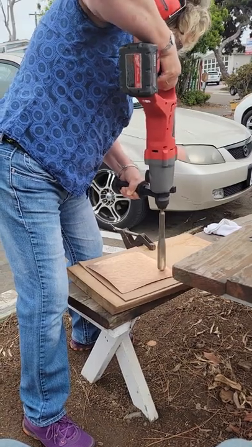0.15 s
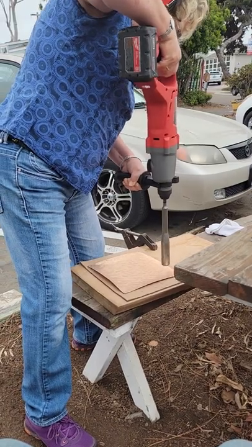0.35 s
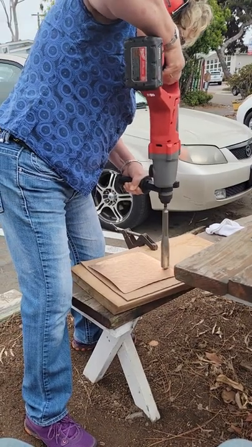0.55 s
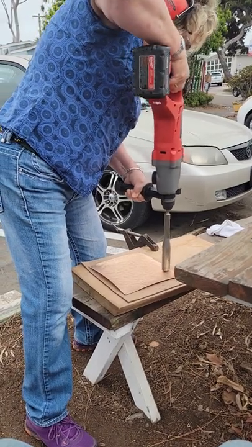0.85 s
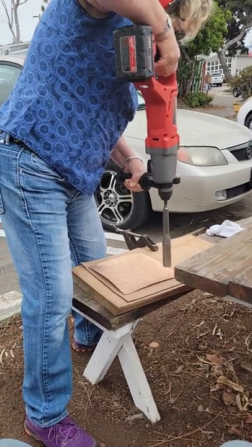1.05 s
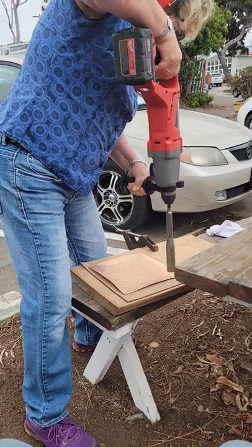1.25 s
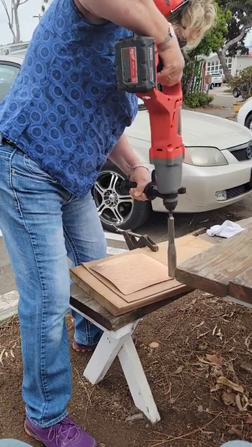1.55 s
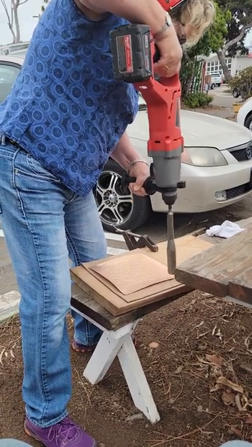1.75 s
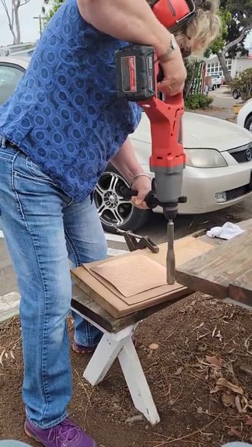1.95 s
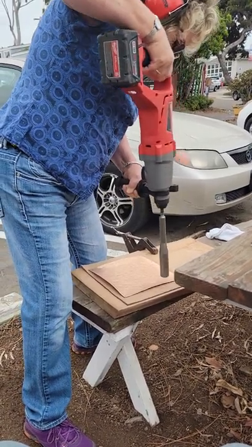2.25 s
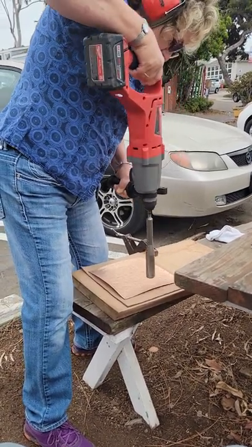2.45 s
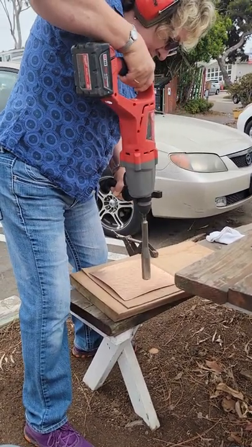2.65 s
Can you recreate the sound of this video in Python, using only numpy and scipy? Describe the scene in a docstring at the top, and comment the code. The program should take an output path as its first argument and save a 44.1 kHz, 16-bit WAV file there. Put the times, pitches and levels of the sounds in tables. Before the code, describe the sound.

Rotary hammer chiselling outdoors: rattling motor whir broken by rapid clattering blows, then coasting down

```python
"""A cordless rotary hammer chisels at a sheet lying on boards across a trestle, outdoors.
Running free, its crank knocks once a turn over rattling gears (filtered clicks and pulsed noise) and a
motor whine (sines). After two opening blows it is pressed down three times and pounds in short bursts of
crack, zing and thud; the sheet's modes ring, and so does the loose chisel as it is lifted.
Then the trigger is let go and the motor coasts, over a low street rumble."""
import sys
import numpy as np
from scipy import signal
from scipy.fft import rfft, irfft, next_fast_len
from scipy.io import wavfile
from scipy.ndimage import uniform_filter1d

SR = 44100
rng = np.random.default_rng(int(sys.argv[2]) if len(sys.argv) > 2 else 0)


def master_out(mix):
    """Clip the mix to full scale and print it as 16-bit PCM to the path in sys.argv[1]."""
    frames = np.transpose(np.atleast_2d(mix))
    ceiling = np.clip(frames, -1, 1)
    pcm = np.round(ceiling * 32767).astype(np.int16)
    wavfile.write(sys.argv[1], SR, pcm)


N = 123479
T = np.arange(N) / SR

CRANK_HZ, MOTOR_PER_CRANK = 72.7, 6.25  # steady crank speed; motor turns per crank turn
RELEASE_S, COAST_S = 2.465, .42  # trigger let go; time constant of the falling speed
# Stretches of free running: (first knock [s], end [s])
FREE_RUNS = [(0.2574, .765), (1.0882, 1.385), (1.6237, 1.96), (2.1865, 2.8)]
# Loudness of the running mechanism: (time [s], body level [dB], treble level [dB])
DRIVE_LEVELS = [(0.188, -59, -56), (.21, -17, -21), (.27, -27, -26.5), (.36, -21, -22.5), (.74, -19.5, -19),
                (.83, -27.5, -37), (.93, -23.5, -32.5), (1.0, -27.5, -24), (1.11, -31, -31.5),
                (1.22, -29, -27.5), (1.36, -27.5, -26.5), (1.47, -18.5, -35), (1.64, -34.5, -33.5),
                (1.72, -31.5, -31.5), (1.91, -30.5, -29), (2.05, -22.5, -33), (2.21, -34, -32.5),
                (2.35, -29, -29), (2.47, -27, -28.5), (2.57, -31.5, -33), (2.68, -39.5, -39.5),
                (2.8, -46, -40.5)]
# Knock of the housing, low part: (multiple of crank speed, level [dB])
KNOCK_HARMONICS = [(1, -12), (2, -26), (3, -26), (4, -15), (6, -16), (7, -8), (8, -16), (9, -17), (10, -2),
                   (11, -11), (12, -11), (13, -2), (14, 1), (15, -4), (16, 0), (17, 4), (18, 0), (19, -3),
                   (20, 2), (22, 0), (23, -7), (24, -9)]
# Knock of the housing, upper part: (frequency [Hz], level [dB])
KNOCK_TREBLE = [(1950, -9), (2150, -13), (2500, -4), (2900, -12), (4000, -18), (6800, -21), (8500, -29),
                (15500, -32)]
# Colour of the gear rattle: (frequency [Hz], level [dB])
GEAR_SPECTRUM = [(40, -26), (250, -17), (600, -16), (850, -11), (1050, -6), (1500, -6), (1800, -8),
                 (2150, -9), (2550, 1), (2900, -4), (3600, -5), (4700, -12), (7000, -30), (16000, -45)]
# Colour of the treble fizz: (frequency [Hz], level [dB])
FIZZ_SPECTRUM = [(40, -59), (2500, -61), (4300, 0), (5700, 2.5), (6700, 6.5), (7700, 6.5), (8400, -4),
                 (9300, -0.5), (11000, -6.5), (13000, -7.5), (13900, 5), (16000, -39)]
# Colour of the short tick at each crank knock: (frequency [Hz], level [dB])
TICK_SPECTRUM = [(100, -50), (3000, -12), (6000, -2), (9500, 0), (12000, -2), (16000, 0)]
KNOCK_DB, GEARS_DB, FIZZ_DB, WHIRR_DB = -2.8, -5.3, -6.5, -10
# Motor and gear whine: (multiple of motor speed, level [dB])
WHINE_HARMONICS = [(4, -6), (5, -1), (6, -6), (7, -7), (8, -6), (10, 0), (12, 1), (14, -8)]
# Resonances of the housing that the whine passes through: (frequency [Hz], level [dB])
HOUSING_SPECTRUM = [(100, -30), (800, -12), (1120, 0), (1550, -3), (2050, -13), (2350, -4), (2580, 2),
                    (2780, -1), (3050, -9), (3480, -4), (3900, -12), (6000, -16), (16000, -40)]
WHINE_DB = -55

# Hammer blows, relative levels:
# (time [s], peak [dB, unused], crack [dB], chisel zing [dB], thud of the boards [dB])
HAMMER_BLOWS = [(0.212, -6, -19.5, -15.5, -38), (0.243, -6, -19, -14.5, -31.5), (0.757, -6, -24, -18, -32),
                (0.773, -8, -17.5, -18, -25), (0.785, -9, -25, -19, -18.5), (0.799, -7, -17.5, -23, -25),
                (0.814, -8, -22, -21, -21), (0.827, -5, -19, -28, -24), (0.843, -11, -27, -21, -23),
                (0.857, -10, -20.5, -41, -24.5), (0.871, -12, -20.5, -24, -31), (0.884, -8, -21, -25, -23),
                (0.903, -13, -23, -25, -23), (0.914, -9, -20.5, -24, -24), (0.944, -6, -17.5, -22, -44),
                (0.959, -12, -28, -20, -21.5), (0.972, -8, -32, -13, -43), (0.986, -7, -26, -16.5, -25.5),
                (1.016, -15, -32, -24, -33), (1.034, -15, -30, -25, -29), (1.051, -16, -30.5, -29, -38),
                (1.067, -16, -29, -43, -36), (1.383, -7, -22, -22, -18), (1.395, -13, -23.5, -25, -21),
                (1.411, -9, -22, -22, -36), (1.425, -7, -16.5, -16, -28), (1.439, -10, -18.5, -33, -28),
                (1.452, -8, -26, -24, -21.5), (1.465, -7, -24, -17.5, -21.5), (1.481, -9, -21.5, -28, -25),
                (1.494, -6, -17, -15, -16.5), (1.512, -12, -26, -28, -35), (1.523, -4, -15.5, -20, -29.5),
                (1.553, -5, -18.5, -18.5, -26.5), (1.584, -12, -27, -22, -34),
                (1.59, -13, -36, -25.5, -35.5), (1.598, -15, -28, -24.5, -38), (1.933, -15, -51, -25, -21),
                (1.959, -9, -26.5, -22, -23), (1.976, -9, -20.5, -19.5, -22),
                (1.986, -6, -17.5, -20, -26.5), (2.001, -6, -19, -20, -28), (2.014, -4, -16.5, -17, -15.5),
                (2.03, -7, -19.5, -20, -26), (2.042, 10, -20, -24, -23), (2.072, -9, -14.5, -18, -28),
                (2.101, -5, -15.5, -23, -27), (2.13, -7, -17, -19, -25.5), (2.146, -12, -35, -21, -27.5),
                (2.159, -12, -34, -19.5, -34), (2.175, -14, -31.5, -20.5, -29.5)]
# Colour of the crack: (frequency [Hz], level [dB])
CRACK_SPECTRUM = [(100, -12), (500, -8.5), (720, 0.5), (850, -0.5), (980, -6.5), (1100, -0.5), (1350, 2.5),
                  (1780, 4.5), (2200, -10), (2570, -3), (2900, -4.5), (3600, -1), (4700, -18.5),
                  (7000, -7.5), (8500, -19.5), (11000, -17), (16000, -41)]
# Colour of the steel zing: (frequency [Hz], level [dB])
ZING_SPECTRUM = [(100, -50), (5000, -7), (9500, -16), (11000, -14), (13000, -8), (14200, -6.5),
                 (15600, 4.5), (16500, -4)]
# Colour of the thud: (frequency [Hz], level [dB])
THUD_SPECTRUM = [(30, -12), (70, -17), (120, -10.5), (160, -20), (215, -5), (250, 0.5), (310, -1.5),
                 (400, -4.5), (600, -10.5), (750, -18.5), (1100, -16), (3000, -26.5), (16000, -54)]
# Modes of the sheet, before each blow's small scatter: (frequency [Hz], level [dB], t60 [s])
SHEET_MODES = [(251.5, -7, 0.071), (366, -16, 0.035), (724, -6, 0.13), (823.4, -3, 0.069),
               (1058, -11.5, 0.15), (1726, -6.5, 0.082), (2559, 6, 0.022), (3060, -3.5, 0.0083),
               (3795, -13, 0.046)]
CRACK_DB, ZING_DB, THUD_DB, SHEET_DB, PUSH_DB = 2.5, 5, -4, -5.5, 11  # trims on the blow levels
# Jolts of the boards as the chisel bites: (time [s], level [dB], decay [s], centre frequency [Hz])
BOARD_JOLTS = [(.208, -23, .025, 600), (.246, -25, .035, 560), (.764, -17, .016, 340),
               (.972, -29, .03, 450), (1.384, -11, .0045, 430), (1.965, -24, .04, 290)]
# Rings of the loose chisel: (time [s], level [dB])
CHISEL_RINGS = [(.976, -24), (1.005, -34), (1.556, -39), (1.586, -40), (2.073, -35), (2.125, -33),
                (2.147, -23)]
RING_HZ, RING_T60 = 11812, .13

# Colour of the street rumble: (frequency [Hz], level [dB])
STREET_SPECTRUM = [(20, -37), (45, -10), (75, 2), (110, -5.5), (200, -16), (600, -9.5), (2000, -4),
                   (16000, -56)]
STREET_DB = -41.5
# Likeness of the noise in the two channels: (frequency [Hz], correlation [0 to 1])
CHANNEL_LIKENESS = [(30, 0.23), (90, 0.69), (170, 0.87), (400, 0.91), (1500, 0.77), (4000, 0.17),
                    (6000, 0.12), (16000, 0.1)]
# Direction of the tool, phase: (frequency [Hz], lead of the left channel [rad])
TOOL_PHASE = [(100, .1), (260, .7), (480, 1.9), (800, 1.9), (1100, 1.1), (1600, 1.6), (2050, 2),
              (2450, 1.1), (3000, 2.2), (4500, 2.6), (6000, 3.6), (7000, 6), (16000, 28)]
# Direction of the tool, level: (frequency [Hz], left minus right [dB])
TOOL_BALANCE = [(170, -2), (330, -10.5), (520, -1.5), (800, -0.5), (1170, 0), (1600, -1.5), (2050, -5.5),
                (2480, -3), (2900, -1.5), (5500, -3), (6500, -4), (8300, 0.5), (16000, 3)]
# Direction of the sheet, phase: (frequency [Hz], lead of the left channel [rad])
SHEET_PHASE = [(90, 0), (400, -.5), (600, -1.1), (1020, -1.2), (1550, -3), (2000, -6.6), (2500, -4.8),
               (3100, -6.8), (3800, -8.3), (5000, -9.5), (16000, -26)]
# Direction of the sheet, level: (frequency [Hz], left minus right [dB])
SHEET_BALANCE = [(90, 2.5), (250, -4), (520, -3.5), (720, 0), (1400, 1.5), (1630, -8.5), (1900, 1.5),
                 (2150, -1), (2420, 9), (2750, 2), (3700, -1), (4500, -3.5), (16000, -0.5)]
EDGE_HZ = 16100  # upper band limit


def amp(db):
    """Decibels to gain."""
    return 10 ** (np.asarray(db) / 20)


def unit(x):
    """Scales to rms 1."""
    return x / np.sqrt(np.mean(x ** 2) + 1e-20)


def read(points, hz):
    """Reads a table on a log-frequency axis."""
    f, value = np.transpose(points)
    return np.interp(np.log(hz + 1), np.log(f + 1), value)


def add(mix, s, sound):
    """Mixes a sound in at time s."""
    part = mix[..., max(round(s * SR), 0):][..., :sound.shape[-1]]
    part += sound[..., :part.shape[-1]]


def colour(x, points, size=4096):
    """Minimum-phase filter of unit energy with the given spectrum."""
    log_gain = np.log(amp(read(points, abs(np.fft.fftfreq(size, 1 / SR)))))
    spectrum = np.exp(np.conj(signal.hilbert(log_gain)))
    taps = np.fft.ifft(spectrum).real[:size // 2]
    taps /= np.linalg.norm(taps)
    return signal.oaconvolve(np.atleast_2d(x), taps[None], axes=1)[:, :N]


def noise():
    """White noise, partly alike in the two channels."""
    a, b = rfft(rng.standard_normal((2, N)))
    same = np.clip(read(CHANNEL_LIKENESS, np.fft.rfftfreq(N, 1 / SR)), 0, 1)
    return irfft(np.array([a, same * a + np.sqrt(1 - same ** 2) * b]), N)


def strikes(times, levels_db, rise, decay, tail_db=-60, tail_s=.01, hold=0):
    """Envelope of hits that swell quickly, then die away fast with a weaker tail; overlaps add in power."""
    t = np.arange(SR // 4) / SR
    after = np.maximum(t - rise - hold, 0)
    fall = np.exp(-after / decay) + amp(tail_db) * np.exp(-after / tail_s)
    shape = np.minimum(t / rise, 1) ** 2 * fall
    power = np.zeros(N)
    for s, db in zip(times, levels_db):
        add(power, s, (amp(db) * shape) ** 2)
    return np.sqrt(power)


def crank_turns():
    """Turns of the crank: steady speed, then an exponential coast."""
    return np.cumsum(CRANK_HZ * np.exp(-np.maximum(T - RELEASE_S, 0) / COAST_S)) / SR


def mechanism():
    """Each crank turn knocks the housing and shakes the gears; part of the rattle repeats turn after turn."""
    turns = crank_turns()
    times = np.concatenate([np.interp(np.arange(*np.interp(run, T, turns)), turns, T) for run in FREE_RUNS])
    chance = rng.standard_normal((len(times), 2))
    times = times + .00003 * chance[:, 0]
    sizes_db = .7 * chance[:, 1]
    clicks = np.zeros(N)
    places = np.minimum(np.round(times * SR).astype(int), N - 1)
    clicks[places] = amp(sizes_db) * np.sqrt(SR / CRANK_HZ)

    # one fixed burst of tooth noise, mostly shared by the channels, repeats at every click
    t = np.arange(SR // 60) / SR
    teeth = rng.standard_normal((3, len(t))) * np.exp(-t / 0.024)
    teeth = teeth[:2] + 2.7 * teeth[2]
    whirr = signal.oaconvolve(clicks[None], teeth / np.linalg.norm(teeth[0]), axes=1)[:, :N]
    knock_spectrum = [(k * CRANK_HZ, db) for k, db in KNOCK_HARMONICS] + KNOCK_TREBLE
    knocks = colour(amp(KNOCK_DB) * clicks + amp(WHIRR_DB) * whirr, knock_spectrum)

    # noise pulses swell just ahead of each knock; gears and fizz also keep a steady floor
    early = times - .0006
    gear_pulse = unit(0.81 + strikes(early, sizes_db, rise=0.00054, decay=0.0054))
    gears = colour(noise() * gear_pulse, GEAR_SPECTRUM)
    fizz_pulse = unit(0.47 + strikes(early, sizes_db, rise=0.00058, decay=0.0039))
    fizz = colour(noise() * fizz_pulse, FIZZ_SPECTRUM)
    ticks = colour(noise() * strikes(early, sizes_db - 3, rise=.0007, decay=.002), TICK_SPECTRUM)

    s, body_db, treble_db = np.transpose(DRIVE_LEVELS)
    running = T > s[0]
    body = amp(np.interp(T, s, body_db)) * running
    treble = amp(np.interp(T, s, treble_db)) * running
    return body * (amp(GEARS_DB) * gears + knocks) + treble * (amp(FIZZ_DB) * fizz + ticks)


def whine():
    """Motor harmonics slide down through the housing's resonances as it coasts."""
    waver = unit(uniform_filter1d(rng.standard_normal(N), SR // 60))
    motor = MOTOR_PER_CRANK * (crank_turns() + 0.00085 * waver)
    lines = sum(amp(db) * np.sin(2 * np.pi * round(k) * motor) for k, db in WHINE_HARMONICS)
    fade_in = np.clip((T - .2) / .1, 0, 1)
    return amp(WHINE_DB) * colour(lines, HOUSING_SPECTRUM) * fade_in


def blows():
    """The striker drives the chisel into the sheet: a crack, a steel zing, the sheet's modes and a thud."""
    s, _, crack_db, zing_db, thud_db = np.transpose(HAMMER_BLOWS)
    crack_hits = strikes(s, crack_db + CRACK_DB, rise=0.0018, hold=0.0018, decay=0.002,
                         tail_db=-14.5, tail_s=0.013)
    crack = colour(noise() * crack_hits, CRACK_SPECTRUM)
    zing_hits = strikes(s, zing_db + ZING_DB, rise=0.0024, hold=0.00076, decay=0.0024,
                        tail_db=-15, tail_s=0.0081)
    zing = colour(noise() * zing_hits, ZING_SPECTRUM)

    t = np.arange(SR // 6) / SR
    ring, pushes = np.zeros(N), np.zeros(N)
    scatter = rng.standard_normal((len(s), len(SHEET_MODES), 2))  # each mode's level and pitch vary per blow
    for start, db, low_db, chance in zip(s, crack_db, thud_db, scatter):
        modes = sum(amp(level + 2 * a - 60 * t / t60) * np.sin(2 * np.pi * hz * (1 + 0.0074 * b) * t)
                    for (hz, level, t60), (a, b) in zip(SHEET_MODES, chance))
        add(ring, start + 0.002443, amp(db + SHEET_DB) * modes)
        add(pushes, start + 0.0029, amp([low_db + PUSH_DB]))  # single-sample impulse into the thud filter
    thud_hits = strikes(s, thud_db + THUD_DB, rise=0.0057, decay=0.019)
    thud = colour(pushes + noise() * thud_hits, THUD_SPECTRUM)
    return crack + zing + thud + ring


def chisel():
    """The free chisel rings at one very high pitch, slightly weaker on the right."""
    s, db = np.transpose(CHISEL_RINGS)
    envelope = strikes(s, db, rise=0.0014, decay=RING_T60 / np.log(1000))
    return envelope * np.sin(2 * np.pi * RING_HZ * T) * amp([[0], [-1.5]])


def jolts():
    """Dull knocks of the boards on the trestle: noise bursts around a centre frequency."""
    total = 0
    for s, db, decay, hz in BOARD_JOLTS:
        spectrum = [(hz / 8, -26), (hz / 2.46, -16), (hz / 1.42, -1), (hz, 0),
                    (hz * 1.35, -6), (hz * 2.43, -10), (hz * 5, -30), (hz * 20, -60)]
        total = total + colour(noise() * strikes([s], [db], rise=0.0028, decay=decay), spectrum)
    return total


def ports(x, lead, tilt):
    """Sound from one direction reaches the two channels with different phase and level."""
    size = next_fast_len(N + SR // 4)
    hz = np.fft.rfftfreq(size, 1 / SR)
    half = amp(read(tilt, hz) / 2) * np.exp(.5j * read(lead, hz))
    return irfft(rfft(x, size) * np.array([half, 1 / half]), size)[:, :N]


def outdoors(x, wet_db=-17, t60=.16):
    """Faint scatter from the ground and the parked car: sparse random echoes that die away."""
    t = np.arange(SR // 3) / SR
    taps = rng.standard_normal((2, len(t))) * (rng.random((2, len(t))) < .05)
    taps = taps * (t > .003) * amp(-60 * t / t60)
    return x + amp(wet_db) * signal.oaconvolve(x, taps / np.linalg.norm(taps[0]), axes=1)[:, :N]


def street_rumble():
    """Low street rumble: steady coloured noise after a short fade in."""
    return amp(STREET_DB) * colour(noise(), STREET_SPECTRUM) * np.clip((T - .19) / 0.022, 0, 1)


def scene():
    """The tool, sheet, boards and chisel with their scatter, over the street."""
    tool = ports(mechanism() + whine(), TOOL_PHASE, TOOL_BALANCE)
    sheet = ports(blows() + jolts(), SHEET_PHASE, SHEET_BALANCE)
    return outdoors(tool + sheet + chisel()) + street_rumble()


def record(dry):
    """The loudest peaks are rounded off; then the band limit."""
    ceiling = .95
    rounded = ceiling * np.tanh(dry / ceiling)
    low_pass = signal.firwin(301, EDGE_HZ, window=("kaiser", 9), fs=SR)
    return signal.oaconvolve(rounded, low_pass[None], "same")


dry = scene()
out = record(dry)
master_out(out)
```